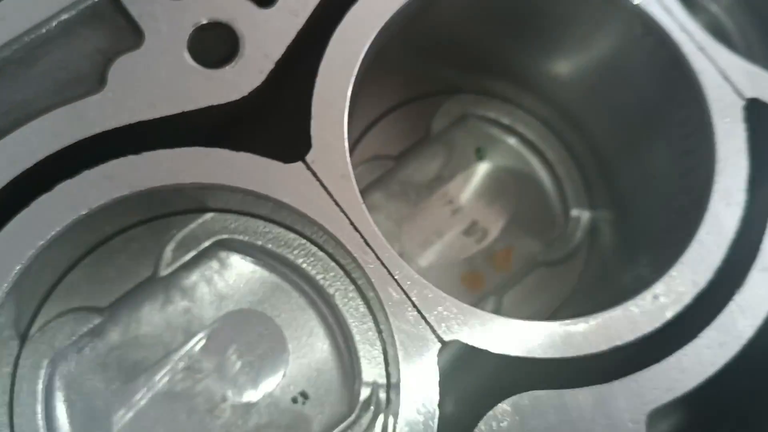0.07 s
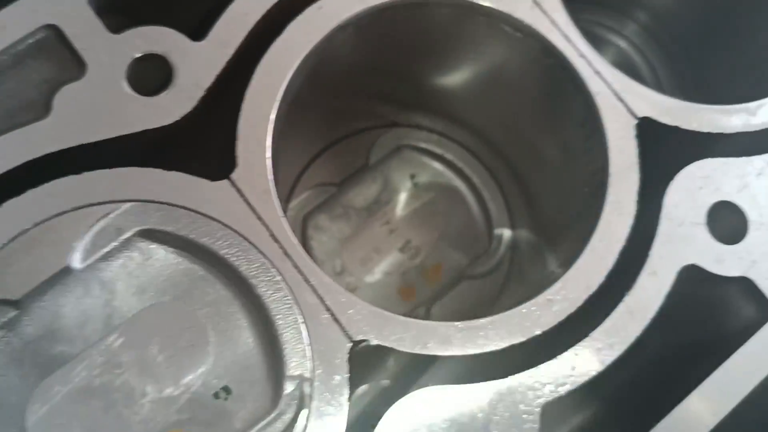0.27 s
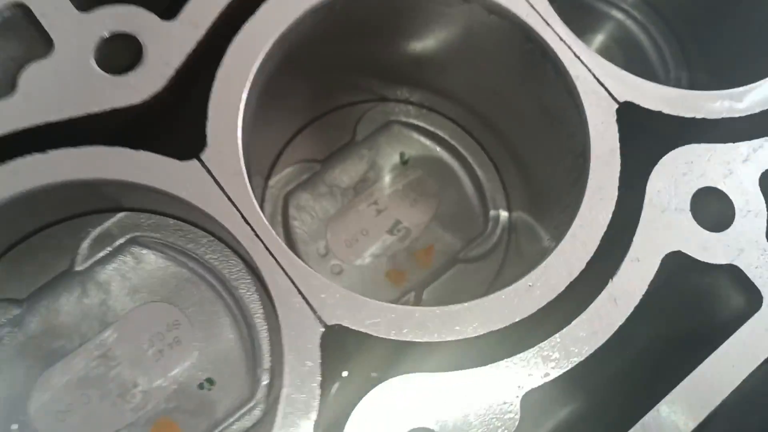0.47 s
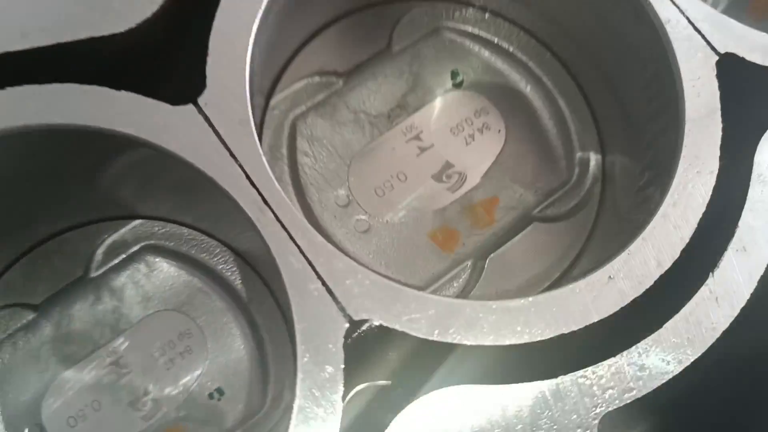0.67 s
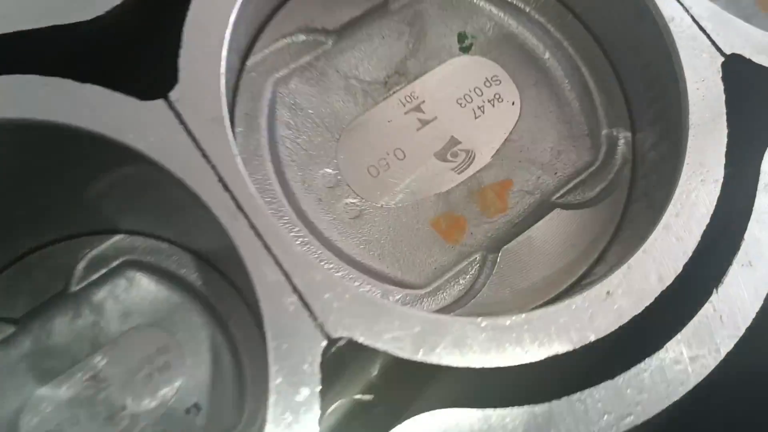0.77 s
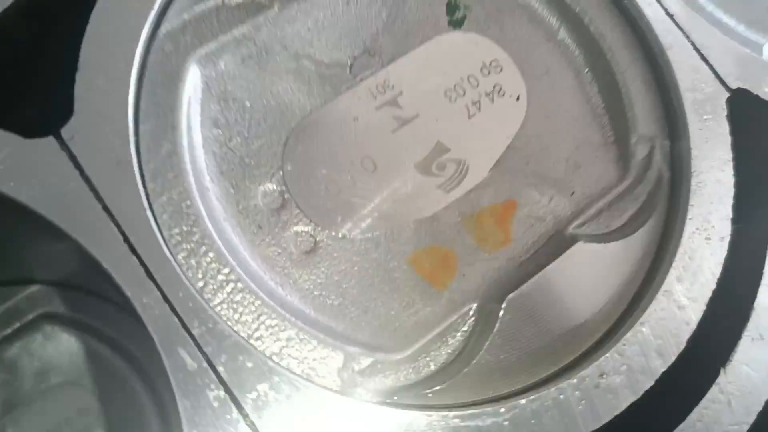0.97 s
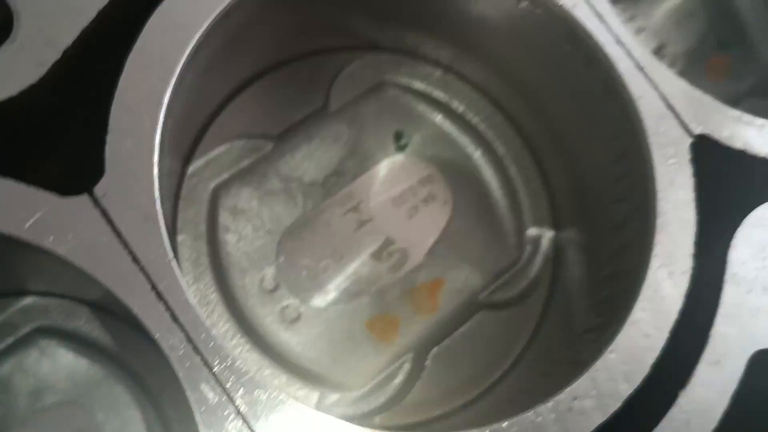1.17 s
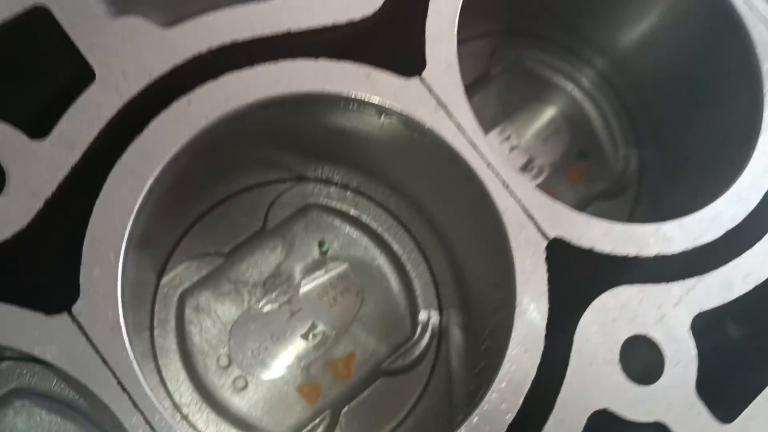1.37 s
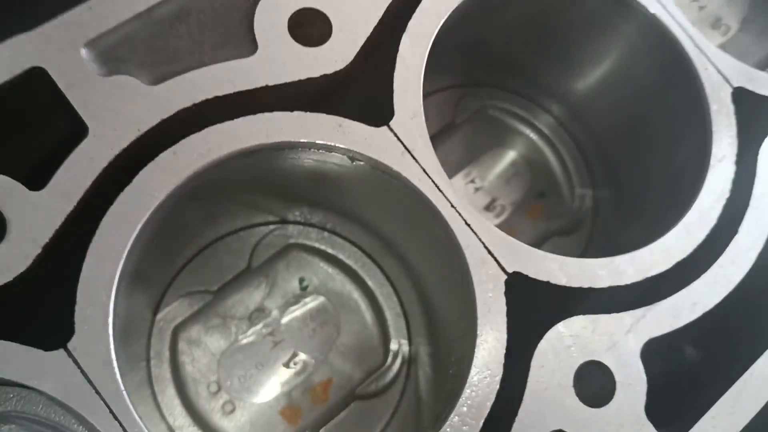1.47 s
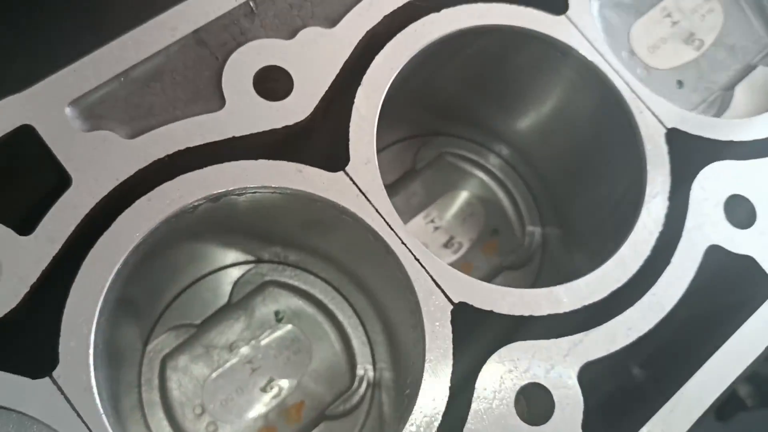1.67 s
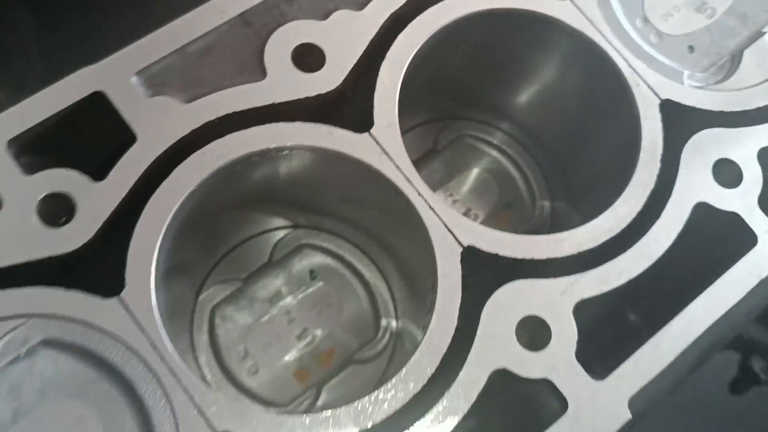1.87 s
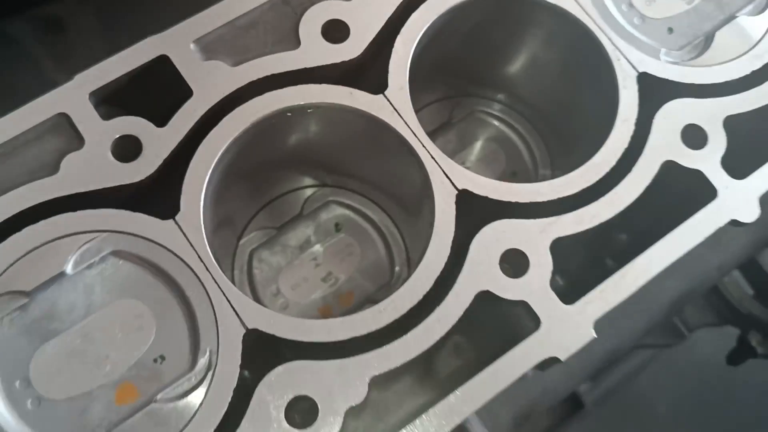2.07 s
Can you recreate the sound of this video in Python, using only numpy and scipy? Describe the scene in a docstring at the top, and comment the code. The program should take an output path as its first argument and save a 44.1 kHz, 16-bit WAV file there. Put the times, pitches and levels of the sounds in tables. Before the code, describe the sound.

Piston rings scrape along hollow metal bores from the start, a bright, gritty rasp with hiss and short rough squeals. It dips near 0.4 s with a soft low knock, surges again, and stalls around 1.03 s. A sharp scrape resumes, weakening through 1.4-1.9 s. Dull knocks, low shuffling and a faint low groan end it, over quiet workshop hum, close and wide, brighter scraping toward the right.

```python
"""An aluminium engine block is cranked stiffly by hand, close up, over a wavering low workshop hum.
From the start the rings rasp along the bores: random catches over smooth sliding shape noise into rings,
block and hiss; narrow noise slides with the hollow bores, and single ring resonances swell into squeals.
From 0.38 s decaying low sines knock softly. The crank stalls near 1.03 s, then the strokes resume and fade.
From about 1.7 s low shuffling noise swells again and a faint low tone rises to a groan."""
import sys
import numpy as np
from scipy import signal
from scipy.fft import rfft, irfft, next_fast_len
from scipy.io import wavfile
from scipy.ndimage import uniform_filter1d, minimum_filter1d, map_coordinates

SR = 44100
rng = np.random.default_rng(int(sys.argv[2]) if len(sys.argv) > 2 else 0)


def transcribe(signal):
    """Save signal, clipped to [-1, 1], as a 16-bit WAV file at the path in sys.argv[1]."""
    frames = np.atleast_2d(signal).T
    limited = np.clip(frames, -1, 1)
    pcm = np.round(limited * 32767).astype(np.int16)
    wavfile.write(sys.argv[1], SR, pcm)


N = 93624

# strokes before and after the crank stalls: [t/s, rasp level/dB, block midrange level/dB, hiss level/dB]
STROKES = [
    [(0.0, -18.5, -35, -35.5), (0.114, -18.5, -27, -33), (0.332, -23.5, -32.5, -44),
     (0.39, -41, -39.5, -55), (0.426, -17, -28, -34.5), (0.466, -16, -31, -32.5), (0.5, -25, -30.5, -41.5),
     (0.57, -27, -33.5, -44), (0.602, -16.5, -25, -33.5), (0.668, -19, -28, -30.5), (0.73, -24, -32.5, -37),
     (0.85, -23, -23.5, -32.5), (0.94, -20, -24.5, -33), (1.014, -25, -30.5, -44), (1.03, -39, -37, -52)],
    [(1.04, -35.5, -36.5, -50.5), (1.072, -15, -28, -32.5), (1.094, -17.5, -24, -28.5),
     (1.2, -22.5, -28, -40), (1.312, -24, -32.5, -36.5), (1.35, -24, -33.5, -43), (1.404, -38, -35.5, -54),
     (1.44, -28, -36, -48), (1.48, -24.5, -29.5, -42), (1.556, -22.5, -33.5, -40.5),
     (1.698, -30, -35.5, -48), (1.812, -28, -32, -45), (1.854, -35.5, -36, -51), (1.98, -55.5, -52.5, -68)],
]
# broad colour of the rings' rasp: [f/Hz, gain/dB]
RASP_COLOUR = [(500, -60.5), (1800, -17), (2450, -12), (2700, 4), (3250, -0.5), (3950, -7), (4450, -24.5),
               (4750, -21), (6000, -25), (12000, -59)]
# ring resonances: [f/Hz, width/Hz, gain/dB]
RING_MODES = [(2716, 100, 0.5), (2989, 183, -1), (3149, 170, 2), (3556, 245, -4), (4109, 79, 0)]
# broad colour of the block: [f/Hz, gain/dB]
BLOCK_COLOUR = [(200, -43), (550, -22), (800, -7), (1100, -5.5), (1400, -6), (2400, 5.5), (3000, -0.5),
                (5000, -35.5)]
# block resonances: [f/Hz, width/Hz, gain/dB]
BLOCK_MODES = [(1660, 124, 2.8), (2043, 67, 4.9), (2173, 74, 4.9)]
# broad colour of the hiss: [f/Hz, gain/dB]
HISS_COLOUR = [(2000, -29.5), (4400, 5.5), (5300, -3), (5620, -4), (6100, -6), (6900, -0.5), (7500, -3),
               (8300, -14), (9600, -19.5), (11000, -14), (13000, -13.5), (16000, -17)]
# lower air resonance of the bores, sinking and recovering: [t/s, f/Hz, level/dB]
HOLLOW_TRACK = [(0, 945, -34), (0.11, 945, -29.5), (0.36, 930, -53), (0.77, 935, -34), (0.83, 900, -40.5),
                (0.89, 740, -47), (0.96, 810, -46), (1.17, 790, -46), (1.25, 930, -37.5), (1.32, 955, -33),
                (1.43, 940, -47.5), (1.56, 940, -34.5), (1.8, 940, -51.5)]
# upper air resonance of the bores: [t/s, f/Hz, level/dB]
UPPER_TRACK = [(0, 1450, -31.5), (0.121, 1490, -24.5), (.22, 1550, -45), (0.5, 1650, -56),
               (0.79, 1360, -27.5), (.93, 1170, -37.5), (1.06, 1219, -46), (1.27, 1347, -32),
               (1.419, 1360, -42), (1.56, 1470, -27), (1.68, 1570, -42), (1.95, 1600, -65)]
# a ring briefly locks into a rough squeal: [t/s, level/dB, f/Hz, width/Hz, time from peak to 1/e/s]
SQUEALS = [(0.026, -25, 4285, 90, 0.14), (0.445, -29.5, 5620, 80.5, 0.031), (0.681, -15, 3020, 140, 0.027),
           (.78, -27, 4170, 110, 0.075), (0.912, -19, 3360, 220, 0.087), (1.088, -18, 2855, 130, 0.031),
           (1.184, -32, 4980, 90, 0.066), (1.282, -26, 4280, 110, 0.074), (1.812, -25.5, 2740, 199, 0.056)]
# scrape and squeals, left over right: [f/Hz, ratio/dB]
BALANCE = [(300, -2), (700, -3.5), (950, 7.5), (1200, -5.5), (2200, -7.5), (2500, -5.5), (2750, -17.5),
           (3300, -12), (4200, -9), (5000, -9), (7300, -10), (9800, 3), (15000, 7.5)]
# correlation of left and right: [f/Hz, correlation -1 to 1]
ALIKE = [(300, .9), (600, 0.47), (950, 0.39), (1300, -0.2), (1750, -0.2), (2400, 0.017), (3000, -0.2),
         (4500, -0.014)]
# low shuffling: [t/s, level/dB]
SHUFFLE = [(0, -42.5), (1.68, -51.5), (1.86, -39), (2.02, -39.5), (2.07, -44.5)]
# broad colour of the shuffling: [f/Hz, gain/dB]
SHUFFLE_COLOUR = [(30, -33), (100, -5), (280, -2.5), (430, -8.5), (550, -9), (1000, -33), (3000, -48.5)]
# low engine resonances: [f/Hz, width/Hz, gain/dB]
LOW_MODES = [(367.3, 16, -6.5), (291, 72, 3)]
# broad colour of the room noise: [f/Hz, gain/dB]
ROOM_COLOUR = [(48, -29), (62, -7.5), (76, -5.5), (95, -6), (200, -9), (500, -17.5), (2500, -23),
               (5000, -33), (12000, -53)]
# soft knocks of the crank: [t/s, level/dB]
KNOCKS = [(.380, -26), (1.032, -33.5), (1.262, -30), (1.837, -38), (1.925, -28), (2.013, -34)]
# partials of a knock: [f/Hz, level/dB, t60/s]
KNOCK_MODES = [(245, -33, .07), (288.5, 0.5, 0.1), (358.6, -11, 0.43)]
# low block mode as the crank creeps to rest: [t/s, level/dB]
GROAN = [(1.72, -57), (1.87, -47), (2.0, -40), (2.06, -57), (2.12, -41)]

RASP_DB, RING_DB, BODY_DB, BLOCK_DB = 2.5, -1, 1.8, -4.5
HISS_DB, SHUFFLE_DB, ROOM_DB, HUM_DB = 7, -1.5, -41.5, -51
CATCHES_PER_S, CATCH_SPREAD_DB, SMOOTH_DB = 2200, 1.5, 4  # SMOOTH_DB: sliding relative to catches
RIPPLE_DB = 3.0
HOLLOW_HALF_WIDTH_HZ, UPPER_HALF_WIDTH_HZ = 52, 108
HUM_HZ, GROAN_HZ, TOP_HZ = 74.5, 371.4, 16050


def amp(db):
    """Decibels to gain."""
    return 10 ** (np.asarray(db) / 20)


def unit(x):
    """Scaled to rms 1."""
    return x / np.sqrt(np.mean(x ** 2) + 1e-20)


def noise():
    """Two independent channels of white noise."""
    return rng.standard_normal((2, N))


def along(points, hz):
    """[f/Hz, value] points interpolated on a log frequency axis."""
    f, v = np.transpose(points)
    return np.interp(np.log(hz + 1), np.log(f + 1), v)


def gains(rows):
    """One gain curve for each dB column after the time."""
    s, *cols = np.transpose(rows)
    t = np.arange(N) / SR
    return [amp(np.interp(t, s, c)) for c in cols]


def wobble(knots_per_s):
    """Smooth random curve through normal knots."""
    knots = rng.standard_normal(N // 20)
    return map_coordinates(knots, [np.arange(N) * knots_per_s / SR], mode="wrap")


def filtered(x, response):
    """x times a response of frequency."""
    m = next_fast_len(N + SR // 2)
    return irfft(rfft(x, m) * response(np.fft.rfftfreq(m, 1 / SR)), m)[..., :N]


def coloured(x, spectrum):
    """x with a broad colour, at rms 1."""
    return unit(filtered(x, lambda f: amp(along(spectrum, f))))


def rung(x, modes):
    """x through parallel steep-sided resonances, at rms 1."""
    def response(f):
        total = 0
        for centre_hz, width_hz, db in modes:
            damping = 1.5j * f * width_hz
            bandpass = damping / (centre_hz ** 2 - f ** 2 + damping)
            total = total + amp(db) * bandpass ** 2  # squared for steep sides
        return total
    return unit(filtered(x, response))


def many_modes(x):
    """The casting's many small modes stand out and recede as the contact moves along the bore."""
    z = signal.stft(x, nperseg=1024)[2]
    field = rng.standard_normal(z.shape[1:])
    field = uniform_filter1d(field, size=2, axis=0)  # bins
    field = uniform_filter1d(field, size=30, axis=1)  # frames
    ripple = amp(RIPPLE_DB * np.clip(unit(field), -2, 2))
    return unit(signal.istft(z * ripple)[1][:, :N])


def spread(pair):
    """Two unrelated signals to left and right, alike in the bass."""
    def mid_side(f):
        turn = np.arccos(np.clip(along(ALIKE, f), -1, 1)) / 2
        return np.array([np.cos(turn), np.sin(turn)])
    mid, side = filtered(pair, mid_side)
    return np.array([mid + side, mid - side])


def lean(f):
    """Left and right gains at constant power: the right side faces the scraping bore."""
    g = amp(np.outer([.5, -.5], along(BALANCE, f)))
    return g / np.sqrt(np.mean(g ** 2, axis=0))


def friction(catch_s, judder_db, judder_knots_per_s):
    """Contact force: tiny random catches over smooth sliding, bunched by an uneven judder."""
    spread_db = CATCH_SPREAD_DB * np.clip(rng.standard_normal(N), -2, 2)
    catches = (rng.random(N) < CATCHES_PER_S / SR) * amp(spread_db)
    power = signal.lfilter([1], [1, -np.exp(-1 / (catch_s * SR))], catches ** 2)
    strength = np.sqrt(power / power.mean() + amp(SMOOTH_DB) ** 2)
    return unit(strength * amp(judder_db * wobble(judder_knots_per_s)))


def rings(force):
    """Force-shaped noise excites a rippled broad rasp and the ring resonances."""
    rasp = coloured(many_modes(force * noise()), RASP_COLOUR)
    return amp(RASP_DB) * rasp + amp(RING_DB) * rung(force * noise(), RING_MODES)


def block(force):
    """Force-shaped noise excites the casting's broad midrange and its main resonances."""
    body = coloured(many_modes(force * noise()), BLOCK_COLOUR)
    return amp(BODY_DB) * body + amp(BLOCK_DB) * rung(force * noise(), BLOCK_MODES)


def hiss(force):
    """Force-shaped noise with a treble colour: the fine grit of the contact."""
    return amp(HISS_DB) * coloured(many_modes(force * noise()), HISS_COLOUR)


def bore_air(track, half_width_hz):
    """Lowpassed noise on quadrature carriers: a narrow band follows a sliding air resonance."""
    s, hz, db = np.transpose(track)
    t = np.arange(N) / SR
    phase = 2 * np.pi * np.cumsum(np.interp(t, s, hz)) / SR
    lowpass = lambda f: 1 / (1 + (f / half_width_hz) ** 2)  # half amplitude at half_width_hz
    a, b = filtered(rng.standard_normal((2, 2, N)), lowpass)
    return amp(np.interp(t, s, db)) * unit(a * np.cos(phase) + b * np.sin(phase))


def scrape():
    """One friction force drives rings, block and hiss; the bores' air follows its own tracks."""
    rasp_gain, block_gain, hiss_gain = gains(np.vstack(STROKES))
    force = friction(catch_s=0.00099, judder_db=0.3, judder_knots_per_s=150)
    air = bore_air(HOLLOW_TRACK, HOLLOW_HALF_WIDTH_HZ) + bore_air(UPPER_TRACK, UPPER_HALF_WIDTH_HZ)
    return rasp_gain * rings(force) + block_gain * block(force) + air + hiss_gain * hiss(force)


def squeals():
    """Short swells of noise, each through one ring resonance, where the drag is hardest."""
    t = np.arange(N) / SR
    out = np.zeros((2, N))
    for s, db, hz, width_hz, fall_s in SQUEALS:
        swell = np.exp(-((t - s) / fall_s) ** 2)
        out += amp(db) * swell * rung(noise(), [(hz, width_hz, 0)])
    return out


def shuffle(uneven_db=2.5, ring_db=-8.5):
    """Low, uneven handling noise, with a fainter noise through the engine's low modes."""
    level, = gains(SHUFFLE)
    rub = noise() * amp(uneven_db * wobble(50.75))
    ring = rung(noise(), LOW_MODES)
    return amp(SHUFFLE_DB) * level * (coloured(rub, SHUFFLE_COLOUR) + amp(ring_db) * ring)


def workshop(waver_rad=1.0):
    """Coloured room noise and a low sine hum whose phase wavers."""
    t = np.arange(N) / SR
    hum = unit(np.sin(2 * np.pi * HUM_HZ * t + waver_rad * wobble(11)))
    room = amp(ROOM_DB) * coloured(noise(), ROOM_COLOUR)
    return spread(room) + amp(HUM_DB) * hum


def knocks(attack_s=0.00088, vary_db=0.94):
    """Dull knocks as the crank's play is taken up: decaying low sines with a soft attack."""
    out, t = np.zeros(N + SR), np.arange(SR // 3) / SR
    for s, db in KNOCKS:
        ring = np.zeros(len(t))
        for hz, level_db, t60_s in KNOCK_MODES:
            decay = amp(level_db + rng.normal(0, vary_db) - 60 * t / t60_s)
            ring += decay * np.sin(2 * np.pi * hz * t)
        out[round(s * SR):][:len(t)] += amp(db) * ring * (1 - np.exp(-t / attack_s))
    return out[:N]


def groan(waver_rad=0.4):
    """A low block mode: a nearly steady sine, faint until it rises at the end of the turn."""
    level, = gains(GROAN)
    t = np.arange(N) / SR
    return level * unit(np.sin(2 * np.pi * GROAN_HZ * t + waver_rad * wobble(25.34)))


def scene():
    """Scraping and handling in the workshop, with knocks and groan in the centre."""
    contact = filtered(spread(scrape() + squeals()), lean)
    return contact + spread(shuffle()) + workshop() + knocks() + groan()


def record(dry):
    """A fast limiter, shared by both sides, holds the peaks; then the band limit."""
    needed = 1 / np.maximum(np.abs(dry).max(axis=0) / .95, 1)
    gain = uniform_filter1d(minimum_filter1d(needed, size=129), size=129)
    return filtered(dry * gain, lambda f: f < TOP_HZ)


dry = scene()
out = record(dry)
transcribe(out)
```